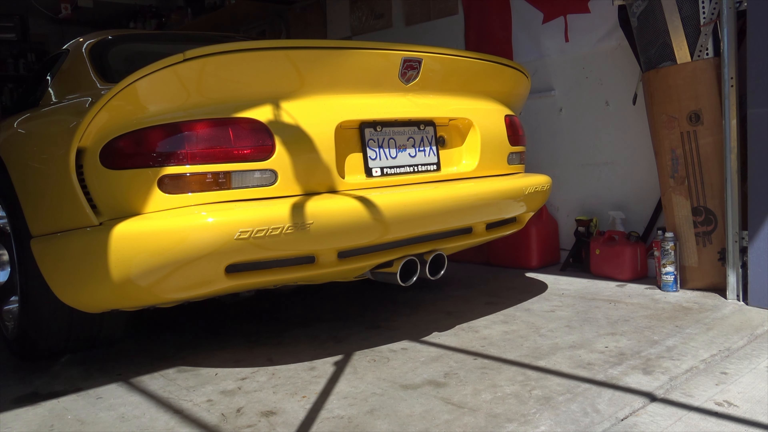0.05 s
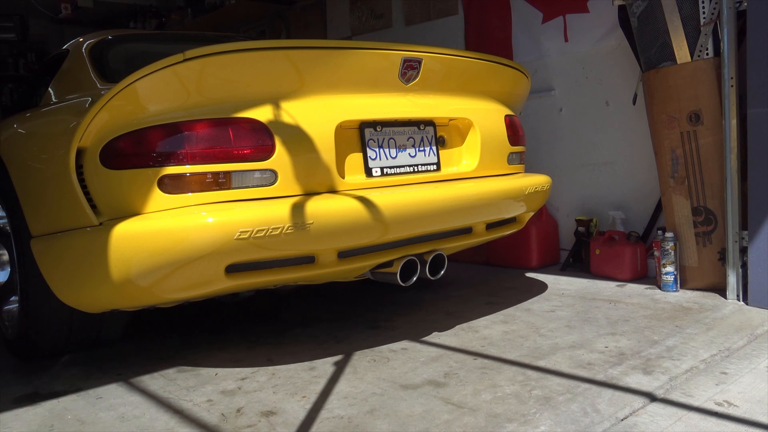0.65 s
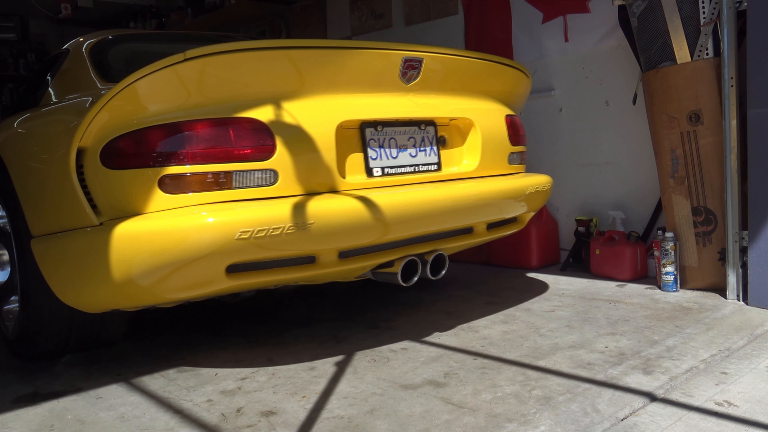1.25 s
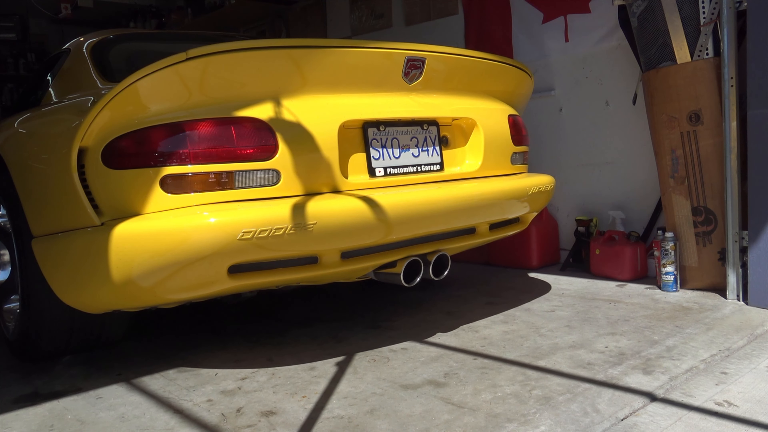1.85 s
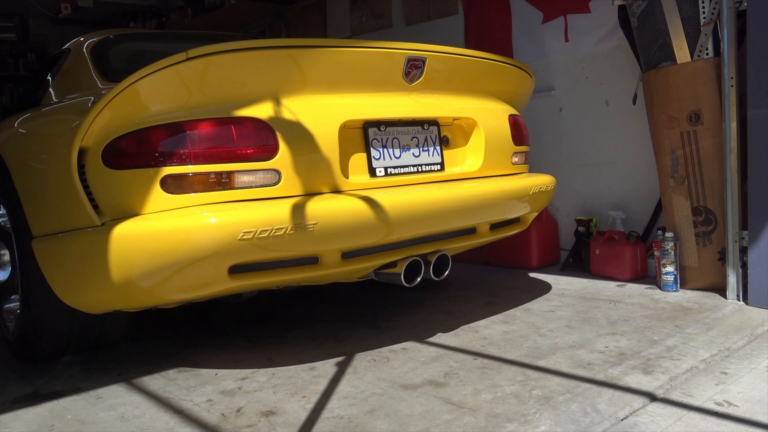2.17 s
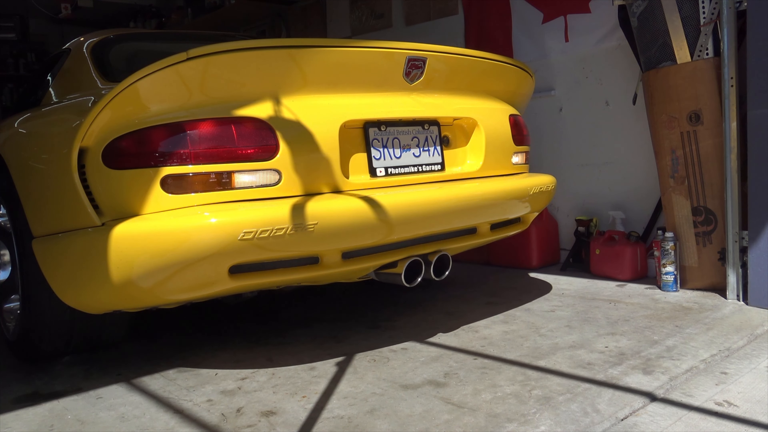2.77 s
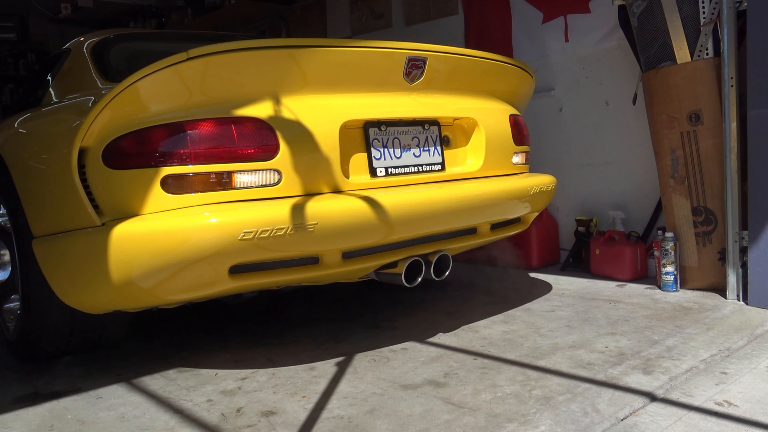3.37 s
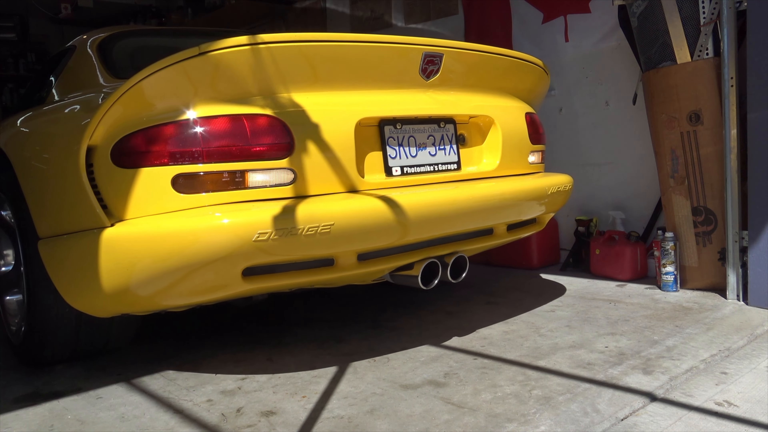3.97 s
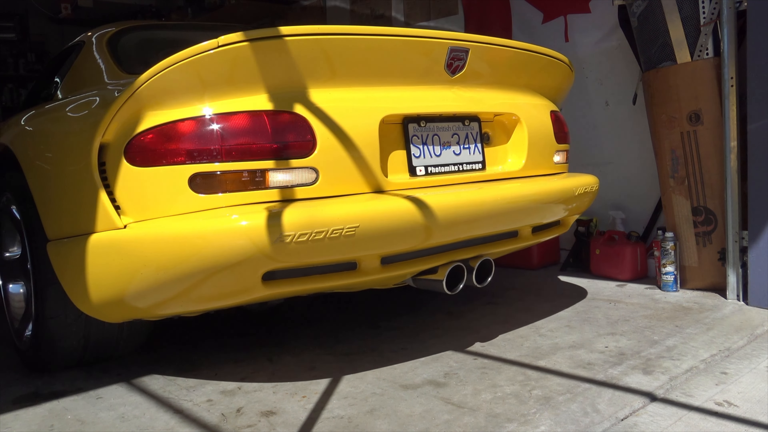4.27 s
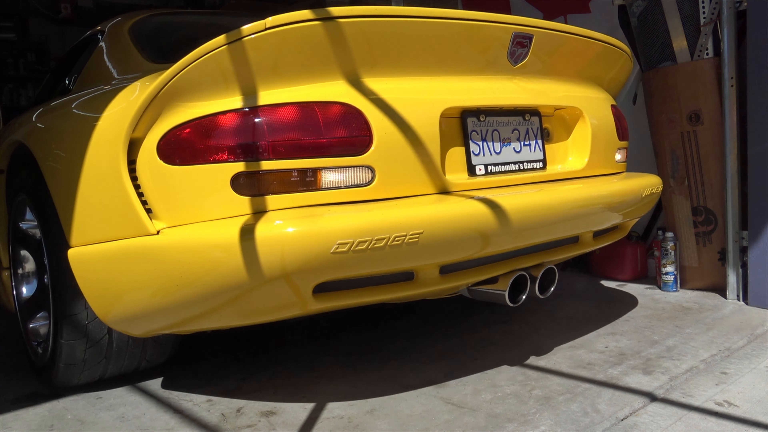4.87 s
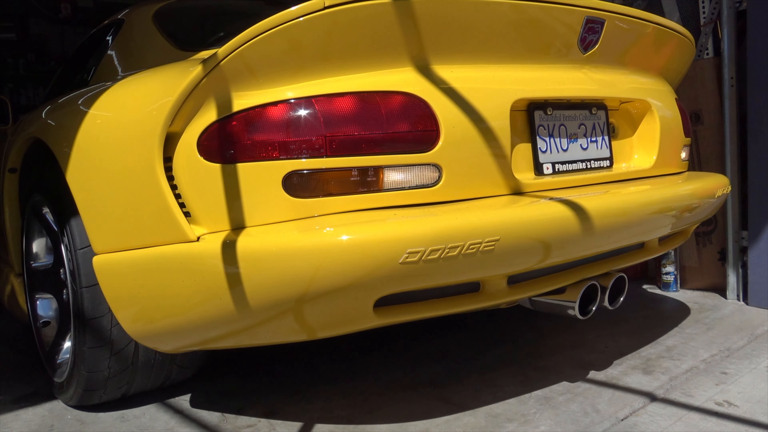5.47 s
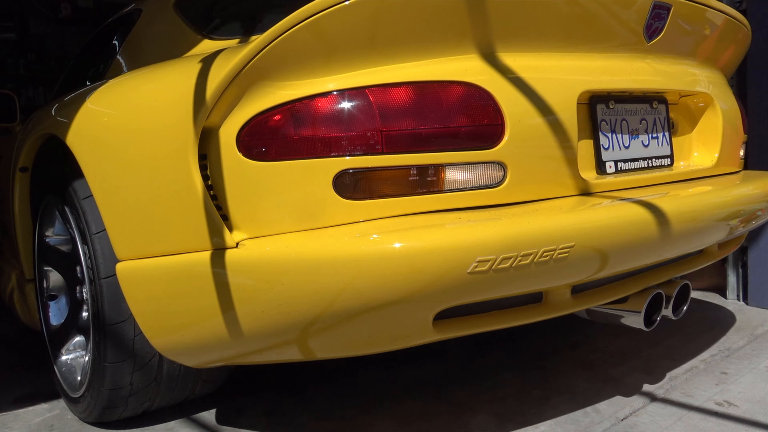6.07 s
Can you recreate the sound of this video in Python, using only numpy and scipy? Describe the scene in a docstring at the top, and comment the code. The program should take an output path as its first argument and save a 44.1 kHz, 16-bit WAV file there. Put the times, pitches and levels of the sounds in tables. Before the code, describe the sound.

A sports car idles in a garage doorway, heard from close behind its tailpipes: a deep, loping throb with light gearbox chatter and a faint fan whirr. At about 1.2 seconds the gear goes in with a short click and a soft thud; the chatter stops and the idle smooths out. At 1.5 seconds the throttle is blipped with a tiny, faint whistle, and the engine rises in a bark and a rush of exhaust gas, peaking around 2 seconds. As the revs fall, the exhaust growls and burbles, with four low pops between 2.4 and 2.8 seconds. A second, softer rev comes at 3.5 seconds and drops away with a few fainter pops around 4.2 seconds. From about 4.5 seconds to the end, just after 6, the car backs slowly out on a steady, low idle drone. The garage adds a short echo.

```python
"""A loping idle and a chattering gearbox: a ten-cylinder sports car stands in a garage doorway, its
twin tailpipes facing the microphone. The gear goes in with a click and the chatter stops. The throttle
is blipped; as the revs fall the exhaust burbles and late burns pop in the pipes. A second, softer push
takes up the clutch and the car backs slowly out at idle. The cylinders' pulses drone and bark through
the pipes, the gas rushes out in puffs, and the garage gives a short answer."""
import sys
import numpy as np
from scipy import signal
from scipy.fft import rfft, irfft, next_fast_len
from scipy.io import wavfile
from scipy.ndimage import uniform_filter1d, map_coordinates

SR = 44100
rng = np.random.default_rng(int(sys.argv[2]) if len(sys.argv) > 2 else 0)


def inscribe(sig):
    """Save sig as 16-bit PCM at rate SR to the path in sys.argv[1].

    A 1-D sig is mono; a 2-D sig holds one channel per row.
    Samples are clipped to [-1, 1] before scaling.
    """
    pcm = np.round(np.clip(np.atleast_2d(sig).T, -1, 1) * 32767)
    wavfile.write(sys.argv[1], SR, pcm.astype(np.int16))


N = 270333
TIME = np.arange(N) / SR


def amp(db):
    """Decibels to gain."""
    return 10 ** (np.asarray(db) / 20)


def along(points, hz):
    """(f/Hz, value) points read on a log frequency axis."""
    f, values = np.transpose(points)
    return np.interp(np.log(hz + 1), np.log(f + 1), values)


def curve(points):
    """(t/s, value) points read at every sample."""
    return np.interp(TIME, *np.transpose(points))


def ramp(start_s, length_s):
    """0 before the start, 1 once the length has passed."""
    return np.clip((TIME - start_s) / length_s, 0, 1)


def swells(rows):
    """The sum of one rise-hold-release envelope per row, kept within 0-1."""
    envelopes = [np.interp(TIME, np.cumsum(times), [0, depth, depth, 0]) for *times, depth in rows]
    return np.clip(sum(envelopes), 0, 1)


def wobble(rate):
    """A smooth random curve, rate knots a second."""
    return map_coordinates(rng.standard_normal(int(N * rate / SR) + 4), [TIME * rate])


def steady(x, size=5800):
    """x brought to rms 1 over about one engine cycle at idle."""
    power = uniform_filter1d(uniform_filter1d(np.atleast_2d(x ** 2).mean(0), size), size // 2)
    return x / np.sqrt(np.abs(power) + 1e-18)


def blend(a, b, share):
    """Equal-power fade from a (share 0) to b (share 1)."""
    return np.sqrt(1 - share) * a + np.sqrt(share) * b


def colour(x, spectrum, size=8192):
    """x through a minimum-phase filter of shape (f/Hz, level/dB)."""
    gain = amp(along(spectrum, np.fft.rfftfreq(size, 1 / SR)))
    cepstrum = irfft(np.log(np.maximum(gain, 1e-6)))
    cepstrum[1:size // 2] *= 2
    cepstrum[size // 2 + 1:] = 0
    return signal.fftconvolve(x, irfft(np.exp(rfft(cepstrum))))[:len(x)]


def level(law, state):
    """Gain from a level law: level/dB unloaded at idle speed, then dB added per octave of speed,
    at full throttle, at full load, when ragged and once out of the doorway."""
    return amp(law[0] + np.dot(law[1:], state))


# reverberation of the garage around the car: f/Hz, t60/s
GARAGE_DECAY = [(100, 0.23), (500, 0.23), (3000, 0.15), (12000, 0.15)]

def garage(x, wet_db, side_db=-25):
    """x plus the garage's short answer, nearly alike on both sides of the microphone."""
    hz, t, noise = signal.stft(rng.standard_normal((2, SR // 2)), SR, nperseg=256)
    decay = amp(-60 * t / along(GARAGE_DECAY, hz)[:, None])
    tail = signal.istft(noise * decay, SR, nperseg=256)[1]
    mid, side = signal.fftconvolve(x[None], tail / np.linalg.norm(tail[0]), axes=1)[:, :N]
    return x + amp(wet_db) * mid + amp(side_db) * np.array([side, -side])


# each cylinder's pulse, in firing order: level/dB
CYLINDER_DB = [5, -3, 6, 0.5, 4.5, 7, -0.5, 6, -0.5, 8]

def firings(cycle, scatter_db, even=1, stagger=0.209):
    """One pulse per cylinder, gaps alternately long and short; even scales the part all pulses share."""
    count = len(CYLINDER_DB)
    k = np.arange(int(cycle[-1] * count))
    due_cycle = (k + 1 - stagger * (k % 2)) / count
    onsets = np.interp(due_cycle, cycle, np.arange(N)).astype(int)
    strength = amp(np.take(CYLINDER_DB, k % count) + scatter_db * rng.uniform(-1.12, 1, len(k)))
    return np.bincount(onsets, strength - (1 - even) * strength.mean(), N)


def puffs(pulses, life_s, between, rise_s=0.00053):
    """Noise that flares at each pulse and dies back to a steady flow."""
    t = np.arange(SR // 20) / SR
    flare = np.exp(-t / life_s) * (1 - np.exp(-t / rise_s))
    gate = steady(signal.fftconvolve(pulses, flare)[:N])
    return (gate + between) * rng.standard_normal(N)


# fan and belts, heard from behind the car: f/Hz, level/dB
FAN_SPECTRUM = [(530, -29), (900, -25), (1040, 3.5), (1130, -5.5), (1520, -4), (2230, -9.5), (9770, -20),
                (12100, -24.5), (13000, -28), (15600, -41)]

def engine_bay(rpm, level_db=-43, db_per_octave=8):
    """Fan and belts whirr smoothly, louder with speed."""
    whirr = steady(garage(colour(rng.standard_normal(N), FAN_SPECTRUM), wet_db=-13))
    return whirr * amp(level_db + db_per_octave * np.log2(rpm / 2000))


# resonances of the gearbox casing: f/Hz, level/dB
CASING_SPECTRUM = [(1150, -30), (1530, 6), (1750, -24), (2130, 4.5), (2550, 0.5), (2900, -13), (4300, -15),
                   (5000, -13), (5600, -26), (6500, -15), (12000, -15), (15600, -26)]

def gear_rattle(cycle, in_neutral, level_db=-41.5):
    """In neutral the loose gears chatter with the firings and ring the casing."""
    chatter = colour(puffs(firings(cycle, scatter_db=4), life_s=0.005, between=0.9), CASING_SPECTRUM)
    return amp(level_db) * in_neutral * steady(garage(chatter, wet_db=-6, side_db=-38))


def gear_shift(at_s, click_db=-24, click_t60=0.0061, thud_db=-25, thud_hz=36, thud_t60=0.092):
    """The gear goes in: a short click and a soft thud through the drive train."""
    t = np.maximum(TIME - at_s, 0)
    noise = colour(rng.standard_normal(N), [(1000, 13), (4000, 1.5), (15000, -8)])
    click = amp(click_db - 60 * t / click_t60) * noise * (t > 0)
    thud = amp(thud_db - 60 * t / thud_t60) * np.sin(2 * np.pi * thud_hz * t)
    return garage(click + thud, wet_db=-1)


# whistles at the opening throttle: t/s, f/Hz, level/dB, Gaussian width/s
PLATE_WHISTLES = [(1.552, 13100, -40, 0.016), (1.585, 7600, -42, 0.023)]

def throttle_whistle(waver=0.00791):
    """Air whistles briefly past the throttle plate while the gap is still narrow."""
    whistles = np.zeros(N)
    for at_s, hz, db, width_s in PLATE_WHISTLES:
        envelope = amp(db) * np.exp(-0.5 * ((TIME - at_s) / width_s) ** 2)
        pitch_hz = hz * (1 + waver * wobble(900))
        whistles += envelope * np.sin(2 * np.pi * np.cumsum(pitch_hz) / SR)
    return whistles


# gas at the pipe mouths (rush in the doorway, rush outside, hiss): f/Hz, level/dB
DOORWAY_RUSH = [(440, -28), (750, 3), (885, -5.5), (993, 4.5), (1080, -3), (1150, 3.5), (1250, -3.5),
                (1530, 0), (1650, -10), (1960, -3.5), (2280, -4.5), (2810, -15.5), (3260, -19.5),
                (3580, -23.5), (4200, -45), (5460, -26), (9240, -120)]
OPEN_AIR_RUSH = [(440, -50), (750, 5), (905, -3.5), (1160, 1.5), (1340, -6.5), (1730, -2), (2280, -17),
                 (2460, -19), (3100, -13), (3550, -29), (4200, -30), (5460, -28), (9240, -120)]
HISS_SPECTRUM = [(2350, 4.5), (4000, -9.5), (5440, -7), (6520, 0), (8140, -1.5), (9380, -4), (10300, -3),
                 (11200, -5.5), (13200, -7.5), (15600, -16)]
# their level laws: level/dB, columns as in level()
RUSH_LAW = (-50.5, 4.5, 28, 15.5, -0.5, 1.1)
HISS_LAW = (-56.5, 0.5, 28.5, 16.5, -1.5, -6)

def tailpipe_gas(cycle, state, outside, wander_db=1.5):
    """Gas puffs out towards the microphone; its rush changes colour as the car leaves the doorway."""
    flow = puffs(firings(cycle, scatter_db=9), life_s=0.0039, between=1.5)
    rush = blend(steady(colour(flow, DOORWAY_RUSH)), steady(colour(flow, OPEN_AIR_RUSH)), outside)
    jet = puffs(firings(cycle, scatter_db=16, even=1.07), life_s=0.0045, between=1.8)
    rush = steady(garage(rush, wet_db=-10, side_db=-22))
    hiss = steady(garage(colour(jet, HISS_SPECTRUM), wet_db=-14, side_db=-23))
    return amp(wander_db * wobble(8)) * (level(RUSH_LAW, state) * rush + level(HISS_LAW, state) * hiss)


# late burns in the pipes: t/s, level/dB, sharpness/0-1
LATE_BURNS = [(2.378, -3, 0.29), (2.442, 2, 0), (2.602, -1.5, 0), (2.816, 0, 0.8), (4.166, -8, 0),
              (4.208, -5, 0.4), (4.262, -14.5, .05), (4.36, -26, 0.2), (4.411, -20, 0.2)]

def pops(boom_hz=125, boom_t60=0.065, crack_hz=420, crack_t60=0.016, rise_s=0.0011):
    """Late burns kick the pipe's low resonance, the sharp ones a higher one as well."""
    burns, t = np.zeros(N), np.arange(SR // 5) / SR
    boom = np.sin(2 * np.pi * boom_hz * t) * amp(-60 * t / boom_t60)
    crack = np.sin(2 * np.pi * crack_hz * t) * amp(-60 * t / crack_t60)
    attack = 1 - np.exp(-t / rise_s)
    for at_s, db, sharpness in LATE_BURNS:
        burns[round(at_s * SR):][:len(t)] -= amp(db) * (boom + sharpness * crack) * attack
    mouth = signal.butter(4, 84, "high", fs=SR, output="sos")  # a small pipe radiates no deep bass
    return garage(signal.sosfilt(mouth, burns), wet_db=-30)


# partials of the coasting growl: multiples of the cycle rate, and level/dB of each
COASTING_ORDERS = [8, 9, 10, 11, 14, 26]
COASTING_DB = [-6, -3, 0, -7, -2.5, 0.5]
# pipe resonances they slide through: f/Hz, level/dB
GROWL_RESONANCES = [(100, 16), (125, -13), (150, 13), (165, -8), (187, -14), (205, 3.5), (228, 6.5),
                    (250, -5.5)]

def growl(cycle, unsteady_db=2.5, drift_rad=0.3):
    """On a shut throttle the cylinders fire unequally: unsteady orders crowd around the firing rate."""
    cycle_hz = np.gradient(cycle) * SR
    tone = np.zeros(N)
    for order, db in zip(COASTING_ORDERS, COASTING_DB):
        gain = amp(db + along(GROWL_RESONANCES, order * cycle_hz) + unsteady_db * wobble(18))
        tone += gain * np.sin(2 * np.pi * order * cycle + drift_rad * wobble(7.7))
    return steady(tone)


# the pipes' answer to uneven pulses: f/Hz, level/dB
BURBLE_SPECTRUM = [(20, -77), (40, -31), (60, -28), (90, -7), (125, -10.5), (155, -7), (185, -17.5),
                   (205, -12), (232, -13.5), (400, -84.5), (900, -105)]
# the burble's level law: level/dB, columns as in level()
BURBLE_LAW = (-26, 4, 4.5, .5, 5, 2)

def burble(cycle, state, overrun, growl_share=0.34):
    """The differences between firings burble in the pipes, mixed with growl as the engine coasts."""
    uneven = firings(cycle, scatter_db=4.5, even=0.16)
    rumble = steady(garage(colour(uneven, BURBLE_SPECTRUM), wet_db=-2))
    return level(BURBLE_LAW, state) * blend(rumble, growl(cycle), growl_share * overrun)


# the bark in front of the pipes, pulling and coasting: f/Hz, level/dB
PULLING_SPECTRUM = [(160, -33.5), (245, -8.5), (285, -1), (327, -2.5), (383, -7.5), (420, -10.5),
                    (503, -13), (580, -13.5), (639, -21.5), (705, -19.5), (900, -29), (1170, -46),
                    (1980, -120)]
COASTING_SPECTRUM = [(160, -37.5), (270, 0), (296, -2.5), (329, 2.5), (388, -10), (482, -1), (538, -10.5),
                     (589, -4), (649, -19), (700, -16.5), (900, -29), (1170, -27), (1980, -120)]
# the bark's level law: level/dB, columns as in level()
BARK_LAW = (-36, 12, 9.5, 12, -0.5, -2.5)

def bark(cycle, state, overrun, spit_db=4.5):
    """The edge of each pulse barks through the pipes with a spit of noise."""
    spit = puffs(firings(cycle, scatter_db=2), life_s=0.004, between=1.15)
    blows = steady(firings(cycle, scatter_db=1.5, even=0.21)) + amp(spit_db) * steady(spit)
    pulling = steady(colour(blows, PULLING_SPECTRUM))
    coasting = steady(colour(blows, COASTING_SPECTRUM))
    return level(BARK_LAW, state) * steady(garage(blend(pulling, coasting, overrun), wet_db=-3))


# partials of the drone: multiple of one bank's firing rate, level/dB
BANK_ORDERS = [(1, -2), (2, -0.5), (3, 2), (4, -54)]
# response of silencer and pipes: f/Hz, level/dB
SILENCER = [(20, -42), (37, -27.5), (49, -25), (59, -14.5), (74, -4.5), (98, -1), (112, 2.5), (147, -4),
            (175, -23.5), (203, -3.5), (240, -19), (310, -14), (500, -35)]
# the drone's level law: level/dB, columns as in level()
DRONE_LAW = (-14, -0.3, 3.5, 0.9, -15.5, -0.5)

def drone(cycle, state, lope, lope_db=-4, lope_at_cycle=0.87):
    """Even firing drones in low orders shaped by the pipes; at free idle they beat each crank turn."""
    per_bank = len(CYLINDER_DB) / 2
    bank_hz = per_bank * np.gradient(cycle) * SR
    tone = np.zeros(N)
    for order, db in BANK_ORDERS:
        gain = amp(db + along(SILENCER, order * bank_hz))
        tone += gain * np.sin(2 * np.pi * order * per_bank * cycle + 0.14 * wobble(23))
    angle = 2 * np.pi * (cycle - lope_at_cycle)
    throb = 1 + lope * (0.12 * np.cos(angle) + 0.42 * np.cos(2 * angle))
    wander_db = 0.65 * wobble(14)
    return level(DRONE_LAW, state) * amp(lope_db * lope + wander_db) * throb * steady(tone)


# the crankshaft: t/s, speed/rpm
CRANK_RPM = [(0, 942.6), (0.5, 902.8), (1.1, 915), (1.2, 867.2), (1.6, 876.8), (1.82, 2124), (1.95, 2452),
             (2.15, 2414), (3, 1416), (3.5, 1127), (3.73, 1400), (3.9, 1415), (4.15, 1197), (4.42, 883),
             (4.75, 855.5), (5, 892.8), (5.6, 882.2), (6.13, 842)]
# pushes on the pedal: t/s, rise/s, hold/s, release/s, throttle opening/0-1
PEDAL_PUSHES = [(1.51, 0.11, 0.14, 0.3, 0.78), (1.69, 0.036, 0.022, 0.072, 0.14),
                (3.48, 0.095, 0.13, 0.41, 0.58)]
# work done with the pedal up (idling, coasting, then moving the car): t/s, load/0-1
PEDAL_UP_LOAD = [(0, 0.86), (1.14, 0.86), (1.19, 0.82), (1.7, 0.88), (2, 0.01), (4.33, 0.06), (5.1, 0.89),
                 (6.13, 0.85)]
# ragged spells as the revs fall, drone giving way to burble: t/s, rise/s, hold/s, release/s, depth/0-1
RAGGED_SPELLS = [(2.06, 0.28, 0.62, 0.32, 0.99), (4.08, 0.06, 0.24, 0.33, 0.58)]
# the car's bearing from the microphone: t/s, left minus right level/dB
CAR_BEARING = [(1.3, .3), (2.3, -.6), (3.3, 0), (4.7, -.2), (5.3, -1.1)]

def scene(idle_rpm=900, shift_s=1.151, lope_in_gear=0.027, overrun_from_rpm=1100, overrun_span_rpm=700):
    """The car heard from behind, outside the doorway; its engine follows the pedal and the crankshaft."""
    rpm = curve(CRANK_RPM)
    cycle = np.cumsum(rpm) / SR / 120  # two turns make one cycle of all cylinders
    throttle = swells(PEDAL_PUSHES)
    load = curve(PEDAL_UP_LOAD) * (1 - throttle)
    outside = ramp(start_s=4.1, length_s=1.8)  # the tailpipes leave the doorway
    state = np.array([np.log2(rpm / idle_rpm), throttle, load, swells(RAGGED_SPELLS), outside])
    in_neutral = 1 - ramp(shift_s, length_s=0.035)
    lope = lope_in_gear + (1 - lope_in_gear) * in_neutral
    high_revs = np.clip((rpm - overrun_from_rpm) / overrun_span_rpm, 0, 1)
    overrun = (1 - throttle) ** 2 * high_revs  # coasting on a shut throttle
    exhaust = burble(cycle, state, overrun) + bark(cycle, state, overrun) + drone(cycle, state, lope)
    car = (exhaust + tailpipe_gas(cycle, state, outside) + engine_bay(rpm) + pops()
           + gear_shift(shift_s) + throttle_whistle() + gear_rattle(cycle, in_neutral))
    pan_db = curve(CAR_BEARING)
    return car * amp([pan_db / 2, -pan_db / 2])


def record(dry, ceiling=0.88, top_hz=15720):
    """The camera's microphone rounds off the highest peaks and keeps nothing above its band limit."""
    rounded = dry / (1 + np.abs(dry / ceiling) ** 8) ** (1 / 8)
    size = next_fast_len(N + SR // 2)
    in_band = np.fft.rfftfreq(size, 1 / SR) < top_hz
    return irfft(rfft(rounded, size) * in_band, size)[:, :N]


dry = scene()
out = record(dry)
inscribe(out)
```